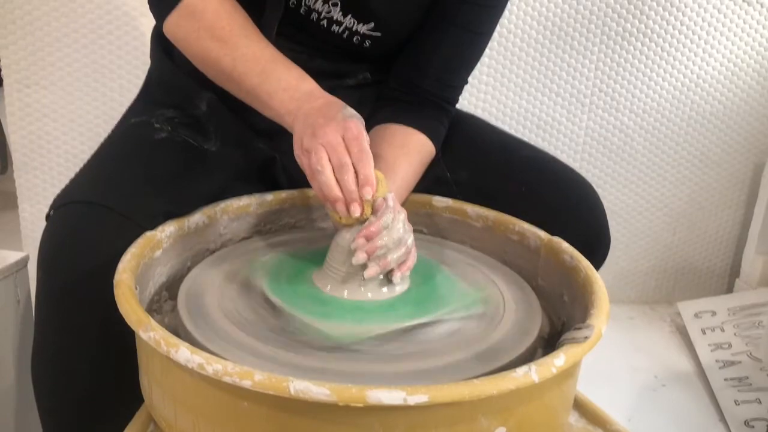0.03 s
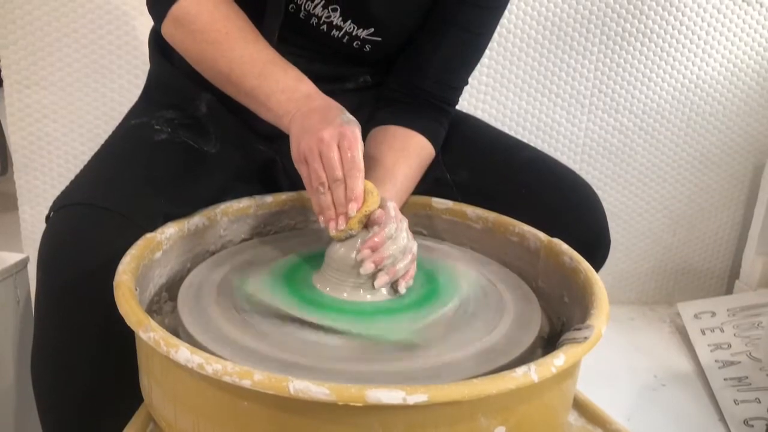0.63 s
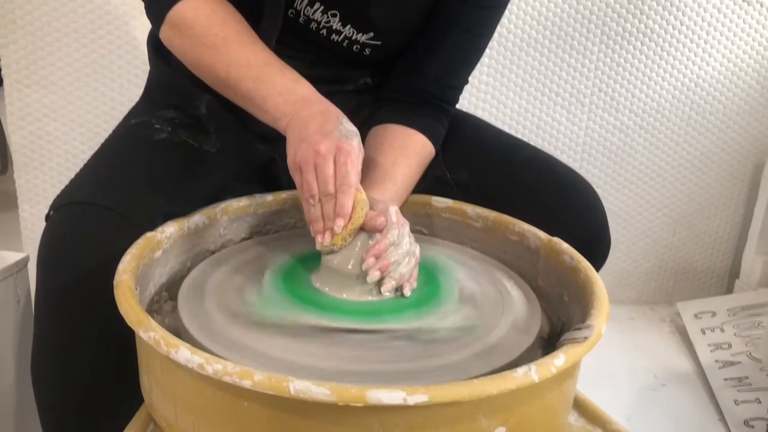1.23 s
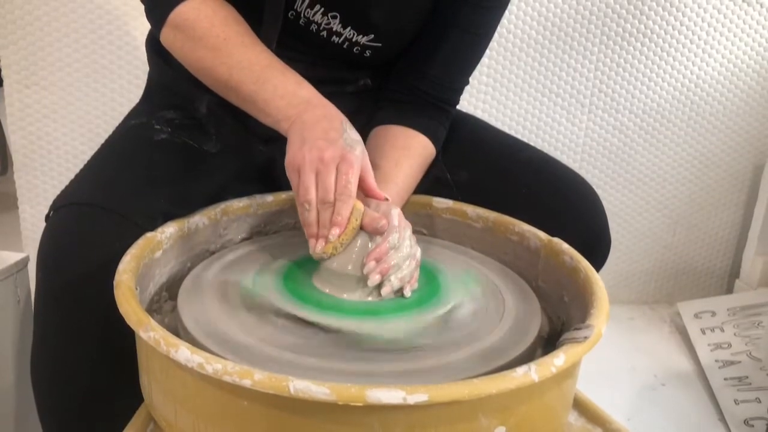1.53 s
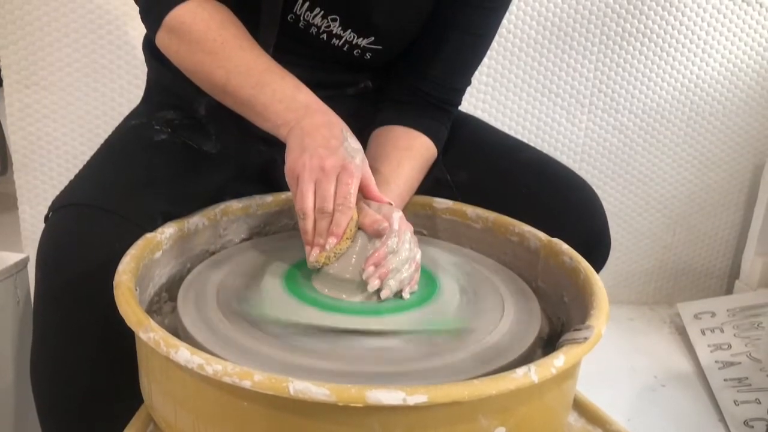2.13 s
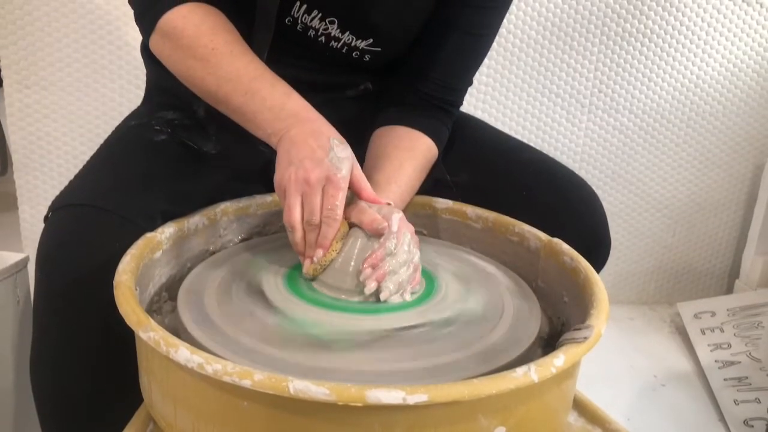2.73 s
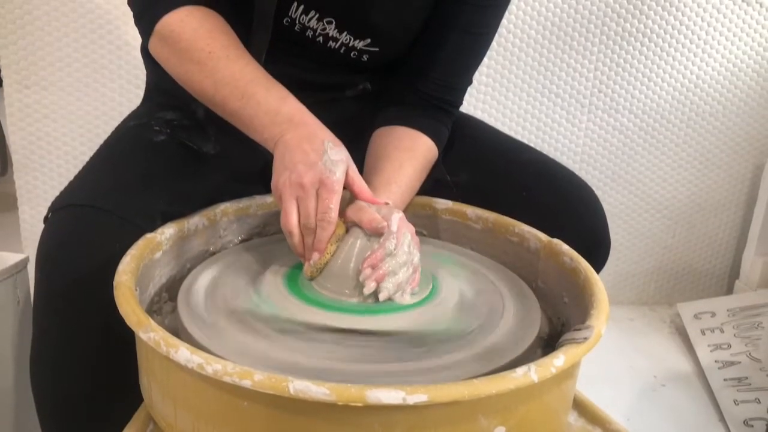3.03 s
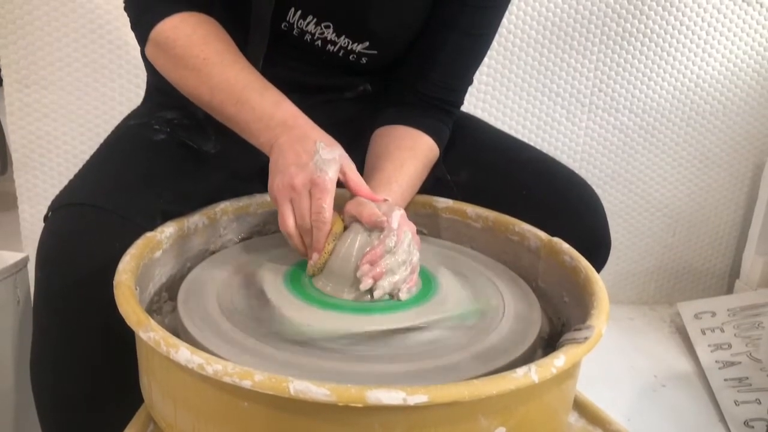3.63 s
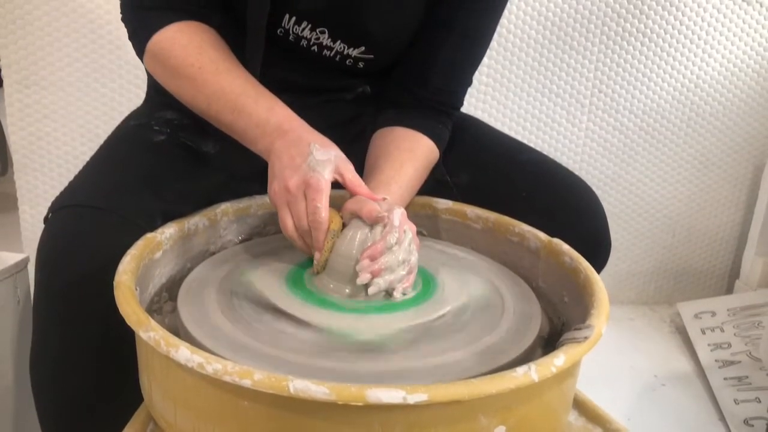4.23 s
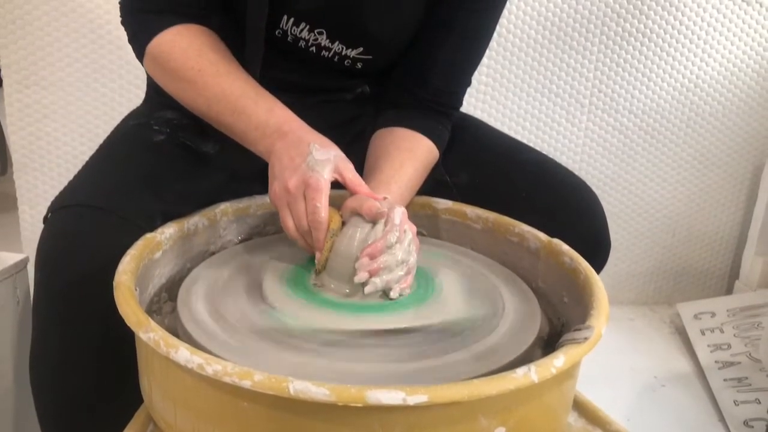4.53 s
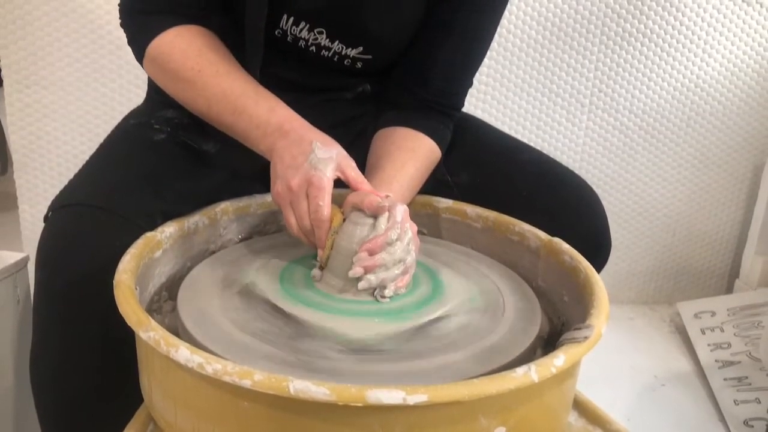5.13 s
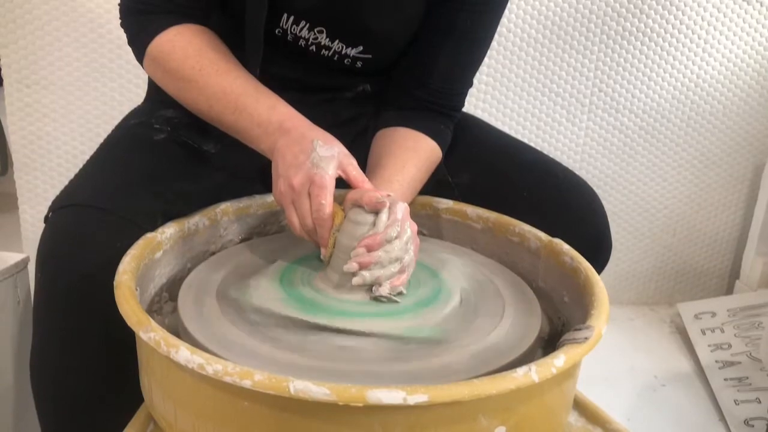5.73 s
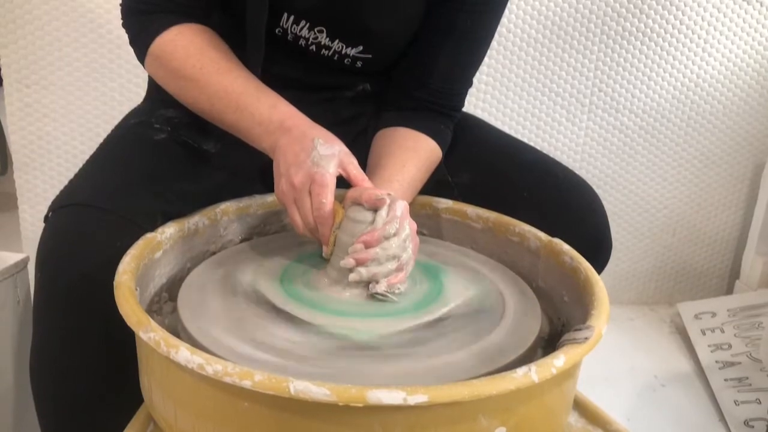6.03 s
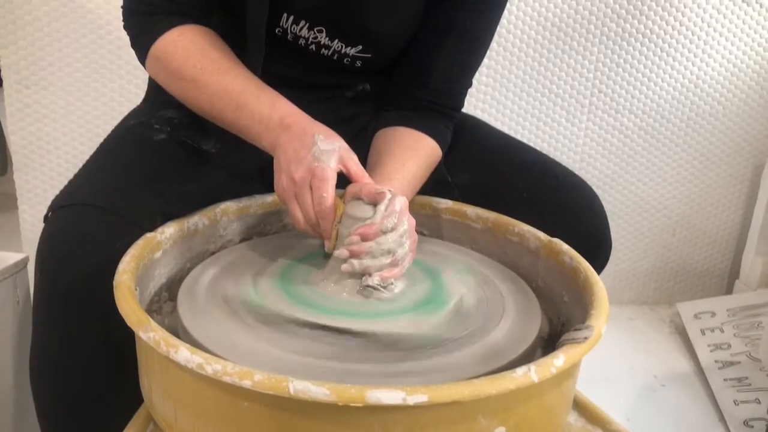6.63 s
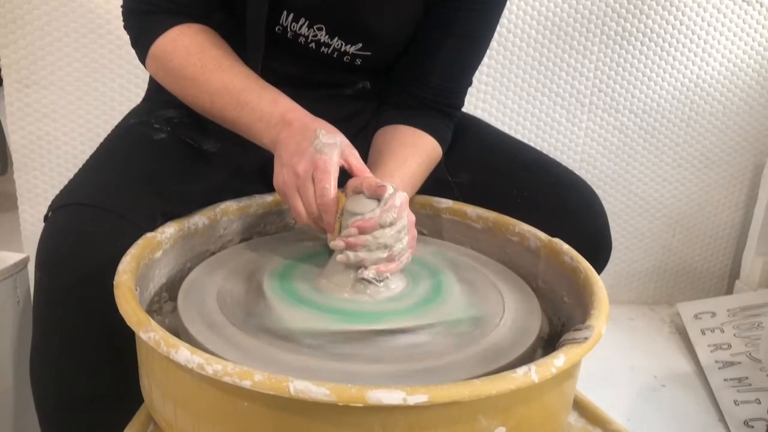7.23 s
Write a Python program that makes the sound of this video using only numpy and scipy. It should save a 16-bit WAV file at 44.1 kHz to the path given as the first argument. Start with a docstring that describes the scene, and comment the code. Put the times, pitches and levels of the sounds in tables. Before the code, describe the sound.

An electric pottery wheel hums and rumbles steadily in a small room, with very faint wet rubbing of hands and sponge on clay.

```python
"""A small room, where an electric pottery wheel turns steadily and wet hands and a sponge shape the clay.
Magnetic forces make the motor hum at twice the mains frequency, its shaft adds wavering harmonics
and friction keeps a bearing singing. The drive belt rumbles and, on every lap, strikes the frame
into damped vibration. Above this drone, bubbles rustle faintly under the sponge and wet clay ticks."""
import sys
import numpy as np
from scipy import signal
from scipy.fft import rfft, irfft
from scipy.io import wavfile

SR = 44100
rng = np.random.default_rng(int(sys.argv[2]) if len(sys.argv) > 2 else 0)


def transcribe(u):
    """Save the signal u as a 16-bit wav file named by the first command-line argument.

    u: samples, shape (n,) or (channels, n), limited to [-1, 1]; the rate is SR.
    q: integer samples, one column per channel.
    """
    v = np.clip(np.atleast_2d(u).T, -1, 1)
    q = np.round(v * 32767).astype(np.int16)
    wavfile.write(sys.argv[1], SR, q)


N = 325458
T, HZ = np.arange(N) / SR, np.fft.rfftfreq(N, 1 / SR)


def amp(db):
    """Amplitude ratio of a level in decibels."""
    return 10 ** (np.asarray(db) / 20)


def unit(x):
    """Normalisation to an rms of one."""
    return x / np.sqrt(np.mean(x ** 2) + 1e-30)


def curve(rows):
    """Linear interpolation of (seconds, value) rows over time."""
    return np.interp(T, *np.transpose(rows))


def colour(points, hz=HZ):
    """Interpolation of a (Hz, dB) spectrum on a logarithmic frequency axis."""
    f, db = np.transpose(points)
    return np.interp(np.log(hz + 1), np.log(f + 1), db)


def noise(db):
    """Gaussian noise with the given spectral density in dB per Hz."""
    return irfft(rfft(rng.standard_normal(N)) * amp(db), N) * np.sqrt(SR / 2)


def drift(rate_hz):
    """Low-pass noise: a smooth random wander up to about the given rate."""
    return unit(irfft(rfft(rng.standard_normal(N)) * np.exp(-(HZ / rate_hz) ** 2), N))


def tone(cycles, db):
    """Simple harmonic motion at the given rms level."""
    return np.sqrt(2) * amp(db) * np.cos(2 * np.pi * cycles)


def held(start, end, attack_s, release_s):
    """Exponential growth to a steady value, then exponential decay after the end."""
    return (1 - np.exp(-np.maximum(T - start, 0) / attack_s)) * np.exp(-np.maximum(T - end, 0) / release_s)


# Spectrum of the hiss. Each row: frequency in Hz, density in dB per Hz.
HISS_SPECTRUM = [(1200, -125), (1800, -107), (2200, -101), (2550, -107.8), (3050, -105.2), (3550, -107.5),
                 (4050, -114.5), (4750, -111), (6300, -117), (7200, -115), (7800, -119.5), (11000, -122),
                 (15700, -128.5)]

def hiss():
    """Stationary broadband noise: the airy hiss of motor and room."""
    return noise(colour(HISS_SPECTRUM))


# Light contact of wet hands with the clay. Each row: time in seconds, level in dB.
HAND_CONTACT = [(0, -92.5), (2, -77.5), (4.4, -73), (5.7, -87), (7.38, -87)]
# Firm sponge presses. Each row: start in seconds, length in seconds, level in dB, release in seconds.
SPONGE_PRESSES = [(1.965, 0.17, -65.5, .03), (2.195, 0.32, -67, .32), (3.63, .28, -67, .04)]

def rubbing(attack_s=.02):
    """Incoherent sources add in power: light contact and firm presses set the rubbing amplitude."""
    presses = sum(amp(db) * held(start, start + length, attack_s, release_s)
                  for start, length, db, release_s in SPONGE_PRESSES)
    return np.hypot(amp(curve(HAND_CONTACT)), presses)


# Timbre of wet rubbing. Each row: frequency in Hz, relative level in dB.
WET_SPECTRUM = [(500, -26.5), (1200, 0.5), (2300, 2), (3300, 0.5), (4300, -7.5), (5300, -9.6), (6300, -16),
                (7200, -12), (8200, -19), (15000, -30)]

def sponge(bubbles_per_s=1200, pitches=36, spread_db=3.0, decay_cycles=7, swish_gain=1.6, clump_db=1.0):
    """Bubbles of slip burst under the sponge and ring as damped oscillators over a smooth swish."""
    t, pops = T[:SR // 50], np.zeros(N)
    for hz in np.linspace(1200, 8000, pitches):
        sizes = amp(spread_db * np.minimum(rng.exponential(1, N), 3.5))
        bursts = rng.random(N) < bubbles_per_s / pitches / SR
        ring = unit(np.sin(2 * np.pi * hz * t) * np.exp(-t * hz / decay_cycles))
        pops += signal.oaconvolve(sizes * bursts, ring)[:N]
    swish = rng.standard_normal(N) * swish_gain
    rustle = (unit(pops) + swish) * amp(clump_db * drift(25))
    return unit(irfft(rfft(rustle) * amp(colour(WET_SPECTRUM)), N)) * rubbing()


# Smacks of wet clay. Each row: start in seconds, relative level in dB, centre in Hz, width in octaves.
CLAY_TICKS = [(0.936, -61, 3010, 0.65), (1.812, -59, 3500, .7), (1.977, -54, 2710, .7),
              (1.994, -52.5, 2380, .4), (2.09, -56.5, 3500, .7), (2.197, -53.5, 3700, 0.8),
              (2.254, -52, 2990, 0.25), (2.312, -58, 3500, 0.7), (2.371, -56.5, 2620, .6),
              (2.466, -56.5, 3500, 0.51), (3.659, -57.5, 3170, .6), (3.774, -61.5, 3030, 0.77),
              (3.869, -55.5, 3580, 0.93), (5.18, -42, 1244, 0.26), (5.182, -56, 2810, 0.41),
              (6.18, -62, 3000, 0.87), (7.228, -62, 3010, .5)]

def clay_ticks(rise_s=0.00026, decay_s=0.0073, room_db=-16, room_s=.03):
    """Wet clay lets go of the fingers in short transients, which reverberation prolongs."""
    out = np.zeros(N)
    for start, db, hz, octaves in CLAY_TICKS:
        age = np.maximum(T - start, 0)
        attack = 1 - np.exp(-age / rise_s)
        decay = np.exp(-age / decay_s) + amp(room_db) * np.exp(-age / room_s)
        smack = unit(noise(-40 * np.log10(1 + (np.log2((HZ + 1) / hz) / octaves) ** 2)))
        out += amp(db) * attack * decay * smack / 2
    return out


# Spells in which the rotor's whine rings out. Each row: start in seconds, end in seconds.
WHINE_SPELLS = [(1.06, 1.54), (2.66, 3.0), (4.56, 7.38)]

def slot_whine(turns, slots=48, quiet_db=-80.5, loud_db=-72.5, waver_db=1.55):
    """The rotor whines thinly at its slot-passing frequency, the slot count times the rotation rate."""
    spell = sum(held(start, end, attack_s=0.064, release_s=.05) for start, end in WHINE_SPELLS)
    return tone(slots * turns, quiet_db + (loud_db - quiet_db) * spell + waver_db * drift(5))


# Resonances of the bearing. Each row: frequency in Hz, bandwidth in Hz, relative level in dB.
BEARING_MODES = [(1015, 22, -0.5), (1392, 34, -17.5), (1946, 20, -26.5)]
# Strength of its singing. Each row: time in seconds, level in dB.
BEARING_LEVEL = [(0, -57), (1.2, -61), (3.3, -58), (3.8, -54.5), (4.9, -56), (6.15, -59.5), (7.38, -59)]

def bearing(flutter_hz=13.5, flutter_db=3.5, waver_db=0.85, squeal_s=6.57, squeal_width_s=.06, squeal_db=7):
    """Friction excites narrow metal resonances, modulated as the balls roll by; they squeal once."""
    out = np.zeros(N)
    for hz, width, db in BEARING_MODES:
        ring = signal.hilbert(noise(-20 * np.log10(1 + (2 * (HZ - hz) / width) ** 2)))
        evened = ring.real / np.sqrt(abs(ring) + 1e-9)  # halves the envelope's swings in dB
        ball_passes = np.cumsum(flutter_hz * (1 + .35 * drift(12))) / SR
        flutter = amp(flutter_db * unit(np.cos(2 * np.pi * ball_passes) + .5 * drift(31)))
        out += amp(db) * unit(evened * flutter)
    squeal = squeal_db * np.exp(-((T - squeal_s) / squeal_width_s) ** 2)
    return out * amp(curve(BEARING_LEVEL) + squeal + waver_db * drift(3.6))


# Rolling noise of bearings and brushes. Each row: frequency in Hz, density before shaping in dB per Hz.
ROLLING_SPECTRUM = [(20, -91), (33, -91), (54, -75.5), (85, -54), (125, -51.5), (175, -70.5), (260, -66),
                    (400, -79.5), (560, -84.5), (720, -89.5), (1600, -104)]
# Resonances of housing and splash pan. Each row: frequency in Hz, width in Hz, lift in dB.
HOUSING_MODES = [(139.5, 29, 7.5), (207.4, 24, 14), (387, 6.2, 5.5), (476.5, 40, 17), (882, 48, 4),
                 (1270, 180, 7)]

def rolling(laps, cutoff_hz=1750, split_hz=600, swell_db=2.5, patchy_db=0.77):
    """Resonance in the housing colours rolling noise, whose low band swells as the belt rubs once a lap."""
    lift = sum(db * np.exp(-2 * ((HZ - hz) / width) ** 2) for hz, width, db in HOUSING_MODES)
    density_db = colour(ROLLING_SPECTRUM) + lift - 10 * np.log10(1 + (HZ / cutoff_hz) ** 10)
    low_share = 1 / (1 + ((HZ + 1) / split_hz) ** 8)
    rub = np.exp(6 * (np.cos(2 * np.pi * (laps - .11)) - 1))
    low = noise(density_db + 10 * np.log10(low_share)) * amp(swell_db * (rub - rub.mean()))
    high = noise(density_db + 10 * np.log10(1 - low_share + 1e-12))
    return low * amp(patchy_db * drift(30)) + high * amp(patchy_db * drift(15))


# Unevenness of the belt. Each row: frequency in Hz, level in dB of a lap harmonic there.
BELT_SPECTRUM = [(40, -81), (46, -59.5), (54, -56.5), (62, -49.5), (72, -50.5), (105, -54), (120, -56.5),
                 (140, -51.5), (160, -59.5), (180, -75.5), (198, -52), (235, -63), (300, -79.5)]

def belt_rumble(laps):
    """Periodic forcing: the belt's unevenness repeats each lap, so it sounds harmonics of the lap rate."""
    harmonics = np.arange(12, 90)
    place = np.linspace(0, 1, SR // 10)
    levels_db = colour(BELT_SPECTRUM, harmonics * laps[-1] / T[-1])
    phases = harmonics[:, None] * place + rng.random((len(harmonics), 1))
    one_lap = tone(phases, levels_db[:, None]).sum(0)
    return np.interp(laps % 1, place, one_lap)


# Shaft tones. Each row: multiple of the rotation rate (rounded in use), level in dB, unsteadiness ratio.
SHAFT_ORDERS = [(2, -40, 0.099), (3, -35.5, 0.61), (5, -44, 0.073), (6, -44, 0.32), (7, -50.5, 0.22),
                (8, -53, 0.15), (10, -57.5, 0.27), (11, -52.5, 0.7), (12, -52.5, 0.27), (13, -68.5, .3),
                (16, -77.5, 0.56), (44, -86, 0.67), (50, -84.5, 0.55), (54, -87, 0.39), (63.9, -88, .4)]
# Faint electrical whistle. Each row: frequency in Hz, level in dB.
WHISTLE_TONES = [(7110, -101), (7230, -95.5), (7470, -98.5), (7590, -102)]

def shaft(turns, unbalance_db=-49, waver_hz=3.5):
    """Unbalance and bearings force harmonics of the rotation rate; the electronics whistle above them."""
    out = tone(turns, unbalance_db)
    for order, db, unsteady in SHAFT_ORDERS:
        wander = drift(waver_hz) + 1j * drift(waver_hz)  # in both amplitude and phase
        modulation = (1 + unsteady * wander) / np.sqrt(1 + 2 * unsteady ** 2)
        carrier = np.exp(2j * np.pi * (round(order) * turns + rng.random()))
        out += np.sqrt(2) * amp(db) * (modulation * carrier).real
    whistle = sum(tone(hz * T + .12 * drift(12), db) for hz, db in WHISTLE_TONES)
    return out + whistle


# Stiff spots of the belt. Each row: place as a fraction of a lap, signed push, contact time in seconds.
STIFF_SPOTS = [(.147, .73, .0023), (.648, -1.0, .0009), (.792, -1.28, .0031)]
# Modes of the frame. Each row: frequency in Hz, relative level in dB, time to decay 60 dB in seconds.
FRAME_MODES = [(71.1, -26.2, .25), (87.2, -21, .19), (109.2, -18, .2), (131, -15.1, .4), (185, -22.2, .06)]

def belt_thumps(laps, rise_s=.005, force_spread=0.19, gain_db=-1.0):
    """Impact excitation: the belt's stiff spots knock the frame; a long contact wakes only low modes."""
    knocks = np.zeros(N)
    for place, push, contact_s in STIFF_SPOTS:
        passes = np.diff(np.floor(laps - place), prepend=np.floor(-place))
        impulses = passes * (1 + force_spread * drift(8.4))
        knocks += push * irfft(rfft(impulses) * np.exp(-(np.pi * HZ * contact_s) ** 2), N)
    t = T[:SR // 2]
    ring = sum(amp(db - 60 * t / t60) * np.sin(2 * np.pi * hz * t) for hz, db, t60 in FRAME_MODES)
    ring *= 1 - np.exp(-(t / rise_s) ** 2)  # rubber pushes softly
    vibration = signal.fftconvolve(knocks, ring)[:N]
    radiation = 1 / np.sqrt(1 + (50 / (HZ + 1)) ** 20)  # the frame is too small to radiate deep bass
    return amp(gain_db) * irfft(rfft(vibration) * radiation, N)


# Load of the hands on the drive. Each row: time in seconds, relative load in dB.
HAND_LOAD = [(0, -0.4), (1.9, 0.01), (2.7, 0.24), (4.4, 0.78), (7.38, 0.17)]
# Partials of the hum. Each row: harmonic number, level in dB, change in dB per dB of load.
HUM_HARMONICS = [(1, -22.5, 2), (2, -29, 2.5), (3, -42.5, 0), (4, -49, -3), (5, -64, 9), (6, -60.5, 1),
                 (7, -80, -2), (9, -73, 0.5), (10, -79, -3.5), (13, -82.5, 2.5), (16, -94.5, -0.5),
                 (19, -88, -1)]

def motor_hum(hum_hz=119.991, flutter=0.0097):
    """Magnetic pull forces vibration at twice the mains frequency; load shifts the harmonics' levels."""
    load, out = curve(HAND_LOAD), np.zeros(N)
    for k, db, load_slope in HUM_HARMONICS:
        phase = k * (k - 1) / 8  # in cycles: the housing delays each overtone differently
        out += tone(k * hum_hz * T + phase, db + load_slope * load) * (1 + flutter * drift(12))
    return out


# Rotation rate of the motor. Each row: time in seconds, turns per second.
MOTOR_SPEED = [(0, 43.79), (2.6, 43.84), (4.2, 43.68), (5.2, 43.93), (7.38, 43.89)]

def scene(turns_per_lap=12.642):
    """Superposition of all sources: the motor's rotation paces shaft and belt, and the hands add load."""
    turns = np.cumsum(curve(MOTOR_SPEED)) / SR
    laps = turns / turns_per_lap
    drive = (belt_thumps(laps) + belt_rumble(laps) + rolling(laps)) * amp(curve(HAND_LOAD))
    motor = motor_hum() + shaft(turns) + slot_whine(turns) + bearing()
    return (motor + drive + hiss() + sponge() + clay_ticks())[None]


def record(dry, fade_s=.0003, cutoff_hz=15740):
    """Band limiting: a low-pass filter removes the highest treble after a very short fade-in."""
    fade_in = 1 - np.exp(-T / fade_s)
    lowpass = signal.firwin(801, cutoff_hz, window=("kaiser", 9), fs=SR)
    return signal.oaconvolve(dry * fade_in, lowpass[None], "same")


dry = scene()
out = record(dry)
transcribe(out)
```